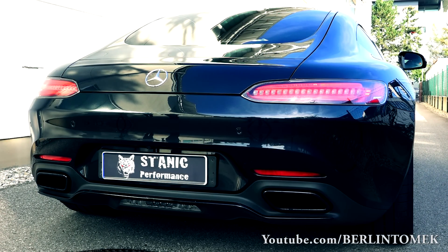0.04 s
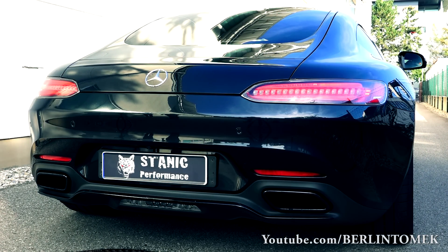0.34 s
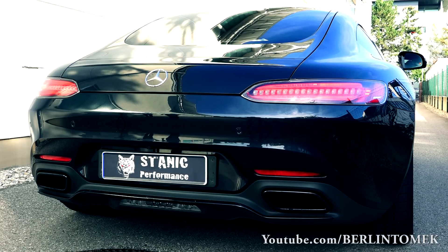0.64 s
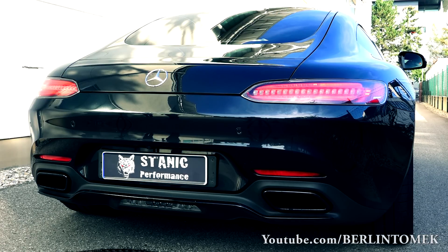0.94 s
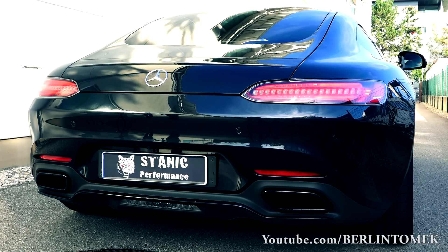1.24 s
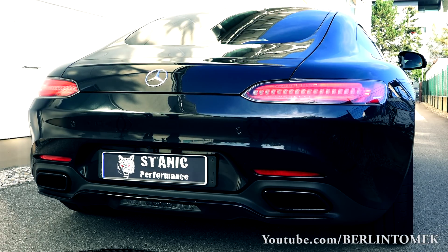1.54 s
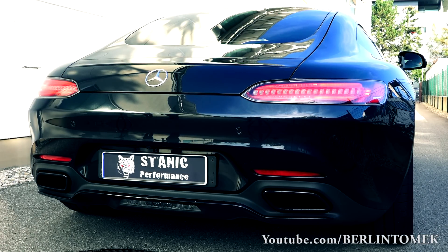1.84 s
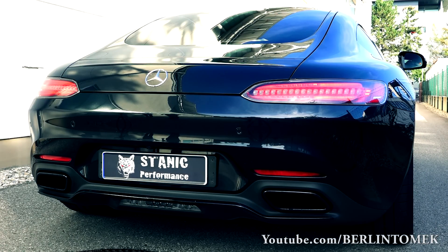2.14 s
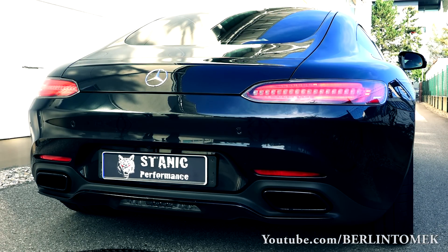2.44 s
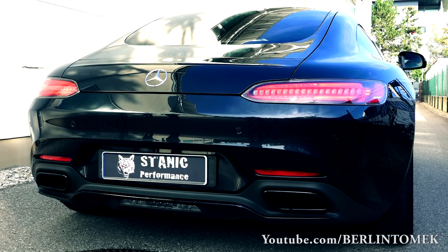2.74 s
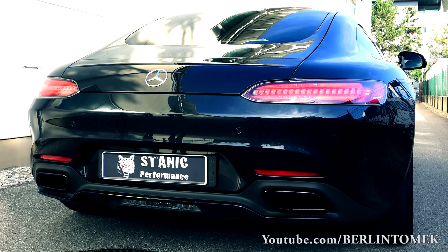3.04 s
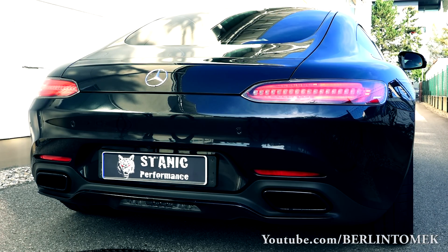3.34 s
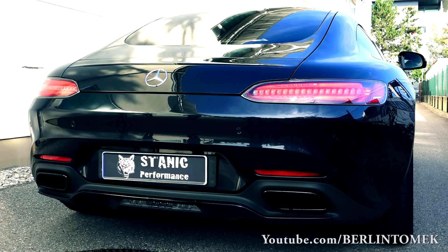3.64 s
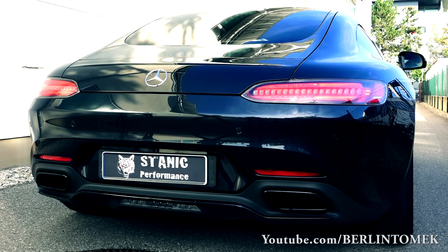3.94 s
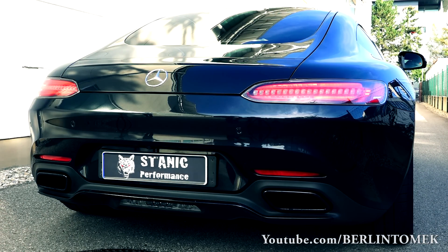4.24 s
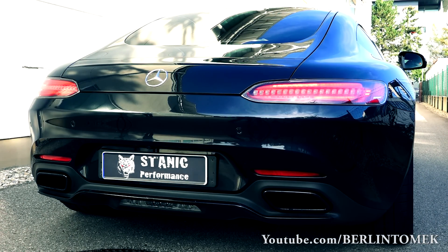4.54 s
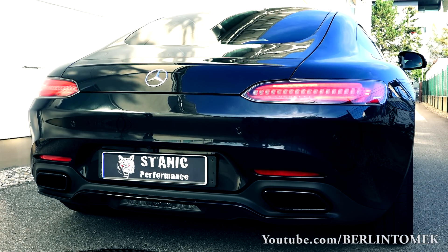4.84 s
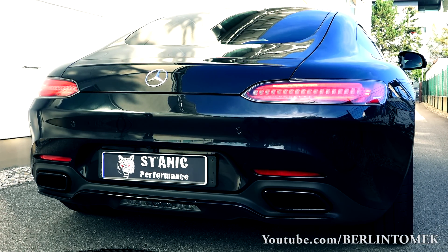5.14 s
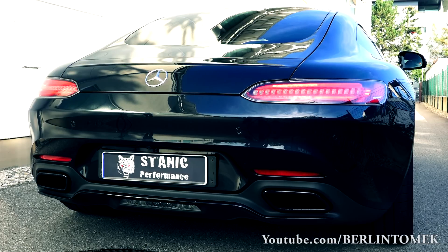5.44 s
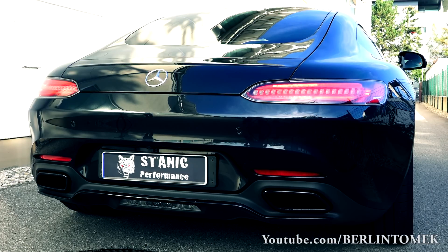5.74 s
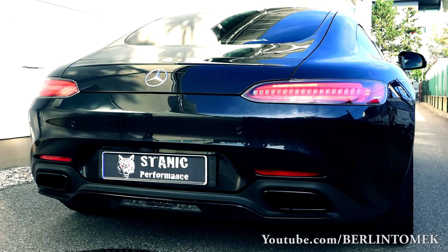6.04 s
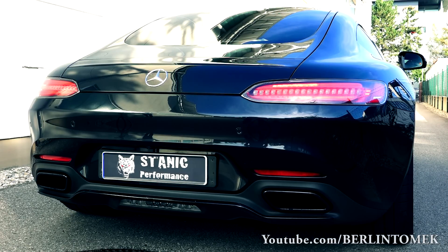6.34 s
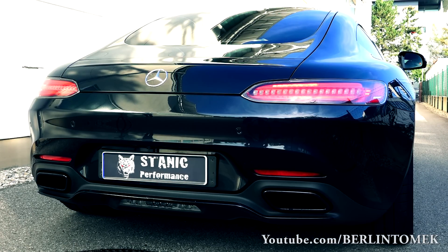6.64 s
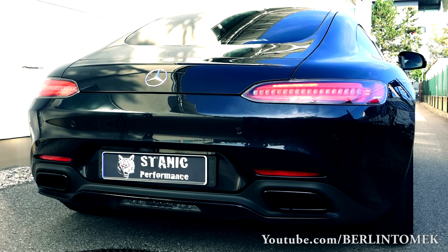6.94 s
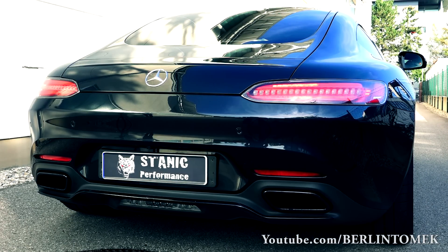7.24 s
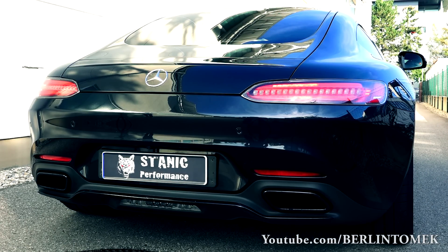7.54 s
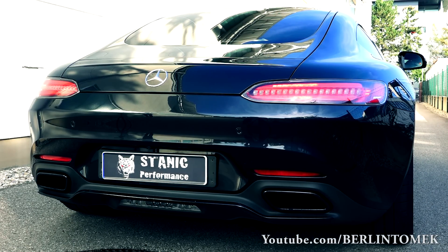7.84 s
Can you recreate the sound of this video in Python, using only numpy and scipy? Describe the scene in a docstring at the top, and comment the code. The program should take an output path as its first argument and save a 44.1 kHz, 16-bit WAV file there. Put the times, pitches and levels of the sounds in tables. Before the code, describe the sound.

A parked sports car's V8 is revved in quick, booming blips that climb higher, with exhaust pops, heard close behind.

```python
"""V8 revving, close behind the tailpipes

One microphone just behind a parked sports car, revved again and again, higher towards the end.
Uneven exhaust pulses boom in the silencer and rasp in the pipes under load; gas hisses between blips.
On the overrun unburnt fuel pops in the pipes. A wall nearby throws the sound back."""
import sys
import numpy as np
from scipy import signal
from scipy.fft import rfft, irfft
from scipy.io import wavfile
from scipy.ndimage import uniform_filter1d

SR = 44100
rng = np.random.default_rng(int(sys.argv[2]) if len(sys.argv) > 2 else 0)


def waveform_to_disk(signal):
    """Save audio, clipped to [-1, 1], as 16-bit WAV at the path in sys.argv[1]."""
    frames = np.transpose(np.atleast_2d(signal))
    scaled = np.clip(frames, -1, 1) * 32767
    samples = np.round(scaled).astype(np.int16)
    wavfile.write(sys.argv[1], SR, samples)


N = 352800
TIME = np.arange(N) / SR
TICKS = np.arange(0, N / SR + .002, .002)   # clock of the controls, t/s

# throttle blips: opens/s, shuts/s, top speed/rpm, climb/s, coasting loss/(1/s), boom/dB, rasp/dB,
# opening spit/dB, coasting boom trim/dB, coasting rasp and hiss trim/dB
THROTTLE_BLIPS = [(.07, 0.351, 2593, .2, 1.21, -11.5, -19, -30.5, 2.5, 2.5),
                  (1.015, 1.255, 2174, .23, 1.55, -10.5, -20.5, -29, 3, 2.5),
                  (1.791, 1.975, 1731, 0.15, 1.44, -12.5, -22, -28.5, 1.5, 2.5),
                  (2.372, 2.616, 1930, .26, 1.4, -13, -22.5, -27.5, 2.5, -0.5),
                  (3.094, 3.318, 1716, 0.32, 1.57, -16, -24, -26.5, -0.5, 1),
                  (4.093, 4.3, 1570, .19, 0.023, -16, -28, -27, 4.5, 0),
                  (4.454, 4.745, 2864, 0.27, 1.07, -10.5, -19.5, -33.5, 0.5, 0.5),
                  (5.232, 5.53, 3284, .26, 1.12, -10.5, -18.5, -43, 2, -0.5),
                  (5.657, 5.916, 3898, .2, .89, -9.5, -18.5, -46, 0.5, -0.5),
                  (6.202, 6.48, 4436, 0.22, 0.89, -11, -16.5, -50, 0.5, -1),
                  (7.11, 7.412, 4313, 0.24, 0.8, -11, -17, -45, -3.5, -5.5),
                  (7.632, 7.893, 5008, 0.22, 0.83, -13, -20, -48, 4, -8)]
# silencer response to the slow part of a pulse: f/Hz, level/dB
SILENCER_RESPONSE = [(20, -21.5), (45, -10), (75, -11), (100, -7.5), (130, -1.5), (165, 3), (210, -0.5),
                     (240, -1), (275, -9.5), (315, -17), (353, -13), (410, -23.5), (480, -14.5), (680, -33),
                     (1100, -63)]
# tailpipe response to a steep pulse front: f/Hz, level/dB
TAILPIPE_RESPONSE = [(200, -11.5), (480, 1.5), (680, -10.5), (830, -1.5), (915, 6), (1000, -2), (1290, 8.5),
                     (1600, 3), (2050, -8), (2600, -14), (3800, -19.5), (5000, -45), (8000, -67.5),
                     (14000, -63)]


def from_db(db):
    return 10 ** (np.asarray(db) / 20)


def rms_one(x):
    return x / np.sqrt(np.mean(x ** 2) + 1e-20)


def drift(per_s):
    """Smooth random wander with an RMS of 1."""
    knots = rng.standard_normal(int(per_s * N / SR) + 2)
    return rms_one(np.interp(TIME * per_s, np.arange(len(knots)), knots))


def butter(x, hz, kind, order=2):
    return signal.sosfilt(signal.butter(order, hz, kind, fs=SR, output="sos"), x + 1e-18)


def resonate(x, response, size=8192):
    """Minimum-phase filter from rows of f/Hz, level/dB."""
    hz, db = np.transpose(response)
    grid = np.maximum(np.arange(size // 2 + 1) * SR / size, 1)
    cepstrum = irfft(np.log(from_db(np.interp(np.log(grid), np.log(hz), db))))
    cepstrum[1:size // 2] *= 2
    cepstrum[size // 2 + 1:] = 0
    return signal.fftconvolve(x, irfft(np.exp(rfft(cepstrum))))[:N]


def ring(clicks, hz, t60):
    """A unit click sets a sine of height 1 ringing."""
    r, w = from_db(-60 / (t60 * SR)), 2 * np.pi * hz / SR
    return signal.lfilter([0, np.sin(w)], [1, -2 * r * np.cos(w), r * r], clicks + 1e-18)


def resonance(x, hz, width_hz):
    """One mode, with gain 1 at its centre."""
    r, w = np.exp(-np.pi * width_hz / SR), 2 * np.pi * hz / SR
    return signal.lfilter(np.array([1, 0, -1]) * (1 - r * r) / 2, [1, -2 * r * np.cos(w), r * r], x)


def evened(x, size=3000):
    """Unit level over about an engine cycle; the throb inside the cycle stays."""
    return x / np.sqrt(uniform_filter1d(uniform_filter1d(x ** 2, size), size) + 1e-14)


def clicks_at(times, heights):
    out = np.zeros(N)
    np.add.at(out, np.clip(np.round(times * SR).astype(int), 0, N - 1), heights)
    return out


def fading(clicks, seconds):
    """Each click starts an exponential decay."""
    return signal.lfilter([1], [1, -np.exp(-1 / (seconds * SR))], clicks + 1e-18)


def envelope(start, end, attack_s, release_s):
    """Straight attack, hold, exponential release."""
    return np.clip((TICKS - start) / attack_s, 0, 1) * np.exp(-np.maximum(TICKS - end, 0) / release_s)


def crank_speed(start_rpm=1297.6, idle_rpm=924.8, flywheel_s=.05):
    """Each blip pulls the speed up, ever more gently; friction drags it back towards idle."""
    rpm = np.full(len(TICKS), start_rpm)
    t = TICKS + .02   # the crank answers before the tailpipes do
    for opens, shuts, top, climb_s, loss_per_s, *_ in THROTTLE_BLIPS:
        to_go = (1 - np.clip((t - opens) / climb_s, 0, 1)) ** 2
        climb = top + (np.interp(opens, t, rpm) - top) * to_go
        coast = np.exp(-loss_per_s * np.maximum(t - shuts, 0))
        rpm = np.where(t < opens, rpm, np.maximum(climb * coast, idle_rpm))
    return uniform_filter1d(rpm, int(flywheel_s / TICKS[1]), mode="nearest")   # inertia rounds corners


def on_throttle(rpm, rasp_db_per_octave=15, arch_db=2):
    """Load, opening and gains of boom, rasp and hiss: a blip spits, builds to a rush, then vents boost."""
    load, opening, boom_gain, rasp_gain, hiss_gain = np.zeros((5, len(TICKS)))
    for opens, shuts, top, _, _, boom_db, rasp_db, spit_db, *_ in THROTTLE_BLIPS:
        lifts = shuts - .044   # the rasp fades as the pedal starts to lift
        held = envelope(opens - .03, shuts, attack_s=.064, release_s=.012)   # the boom swells first
        pedal = envelope(opens, lifts, attack_s=.013, release_s=.046)
        progress = np.clip((TICKS - opens) / (shuts - opens), 0, 1)
        arch = np.sin(np.pi * progress ** 1.2) ** 2 - .5   # fiercest just past mid-blip
        bark = from_db(rasp_db + arch_db * arch + rasp_db_per_octave * np.log2(rpm / top))
        spit = from_db(spit_db) * envelope(opens, opens + .053, attack_s=.053, release_s=.098)
        rush = from_db(-30.5) * envelope(lifts - .12, lifts, attack_s=.12, release_s=.046)
        blow_off = from_db(-32.5) * envelope(shuts, shuts + .053, attack_s=.053, release_s=.076)
        load += pedal
        opening += held
        boom_gain += from_db(boom_db) * held
        rasp_gain += bark * pedal * np.sqrt(held)
        hiss_gain += spit * held + (rush + blow_off) * (top / 4000) ** 2
    boom_gain *= from_db(-5 * np.exp(-((rpm - 4120) / 199) ** 2))   # the boom thins around 4120 rpm
    load *= np.interp(rpm, [1500, 2600], [.75, 1])
    return np.clip(load, 0, 1), np.clip(opening, 0, 1), boom_gain, rasp_gain, hiss_gain


def off_throttle(rpm, opening):
    """Gains of boom, rasp and hiss while coasting: set by the speed, trimmed anew by each blip."""
    # exhaust with the throttle shut: speed/rpm, boom/dB, rasp/dB, hiss/dB
    coasting = [(892, -27, -42, -47), (1020, -35, -41.5, -39), (1470, -27, -40, -39),
                (2200, -20.5, -36.5, -36), (3240, -19.5, -33, -30.5), (3800, -12.5, -30, -27.5)]
    boom_trim, gas_trim, lull_db = 7.5, 0, 0   # the boom starts lively from an earlier blip
    for opens, shuts, *_, boom_trim_db, gas_trim_db in THROTTLE_BLIPS:
        progress = np.clip((TICKS - opens) / (shuts - opens), 0, 1)
        boom_trim += (boom_trim_db - boom_trim) * progress
        gas_trim += (gas_trim_db - gas_trim) * progress
        lull_db += 2 * np.exp(-((TICKS - opens + .031) / .016) ** 2)   # an ebb just before the blip
    speeds, *levels = np.transpose(coasting)
    boom_db, rasp_db, hiss_db = (np.interp(rpm, speeds, db) for db in levels)
    waver_db = np.interp(TICKS, TIME, drift(per_s=14))
    return (from_db(boom_db + boom_trim + waver_db - .91 * lull_db) * (1 - opening),
            from_db(rasp_db + gas_trim - lull_db),
            from_db(hiss_db + gas_trim - lull_db - .98 * opening))


def firings(rpm):
    """Time and strength of every exhaust pulse: eight in two turns of the crank."""
    # cylinders in firing order: pulse strength/dB, lag at the tailpipe/crank degrees
    cylinders = [(6.5, 19.5), (2, 47.5), (3.5, 49.5), (8.5, 18), (-2, 54.5), (3.5, 40), (3.5, 25.5),
                 (1.5, -0.5)]
    degrees = np.cumsum(rpm) * 6 / SR
    k = np.arange(int(degrees[-1] / 90))
    strength_db, lag = np.array(cylinders)[k % len(cylinders)].T
    return np.interp(k * 90 + lag, degrees, TIME), strength_db


def pulses(times, strength_db, scatter_db, jitter_s):
    """No two combustions are quite alike in strength or timing."""
    timing, strength = rng.standard_normal((len(times), 2)).T
    return clicks_at(times + jitter_s * timing, from_db(strength_db + scatter_db * strength))


def drone(rpm, load):
    """The repeating part of the pulse train, voiced by the silencer; it wavers more on the overrun."""
    # engine orders: multiple of the cycle rate, level under load/dB, level on the overrun/dB
    orders = [(1, -10, -10), (2, -9, -7), (3, -3.5, -2), (4, -11, -10), (5, -12, 1.5), (6, 0, -5),
              (7, -4.5, -5.5), (8, -1.5, 0), (9, -8.5, -8.5), (10, -1.2, -4), (11, 0.5, -2.5),
              (12, -13.5, -20.5), (13, 0, -7.5), (14, -4, -16), (15, -10, -6), (16, -7.5, -16)]
    cycles = np.cumsum(rpm) / 120 / SR
    waver_db = 2.6 - 1.4 * load
    out = np.zeros(N)
    for order, loaded_db, overrun_db in orders:
        level_db = overrun_db + load * (loaded_db - overrun_db) + waver_db * drift(per_s=22)
        out += from_db(level_db) * np.sin(2 * np.pi * (order * cycles + rng.random()))
    return evened(resonate(out, SILENCER_RESPONSE))


def burble(times, strength_db, rpm):
    """Uneven firings thud in the silencer, deeper at low speed."""
    thuds = resonate(pulses(times, strength_db, scatter_db=2, jitter_s=.00041), SILENCER_RESPONSE)
    depth = np.interp(rpm, [900, 2800], [1.6, .3])
    return evened(butter(thuds + depth * butter(thuds, 110, "low", order=1), 31, "high"))


def boom(times, strength_db, rpm, load):
    """Near idle the engine burbles; speed and throttle make it run clean."""
    rough_db = np.interp(rpm, [950, 1530, 2700, 4340], [-4, -7, -7, -11.5]) + 4.25 * (1 - load)
    return evened(drone(rpm, load) + from_db(rough_db) * burble(times, strength_db, rpm), size=4000)


def rasp(times, strength_db, rpm, load, round_trip_s=.0093):
    """Steep fronts bark in the pipes, each trailed by a turbulent puff and a silencer reflection."""
    fronts = pulses(times, .8 * strength_db, scatter_db=1.6, jitter_s=.00003)
    puffs = fading(fronts, .0045) * rng.standard_normal(N)
    front_share = .15 + .65 * load * np.clip(rpm / 3000, 0, 1)
    flow = np.sqrt(front_share) * evened(fronts) + np.sqrt(1 - front_share) * evened(puffs)
    reflection = .2 * np.interp(TIME - round_trip_s, TIME, flow)
    bark = evened(resonate(flow + reflection, TAILPIPE_RESPONSE))
    sharpness = .38 * (rpm / 4500) ** 2   # fast flow sharpens the fronts
    return bark + sharpness * butter(bark, 3000, "high", order=1)


def gas_hiss(times, strength_db, rpm):
    """Soft chuffs ring the metal tips unevenly; at speed they merge into a smooth, brighter rush."""
    # sheet-metal modes of the tips: f/Hz, width/Hz, level/dB
    tip_modes = [(1114, 50, 20.5), (1242, 150, 14), (1566, 92, 15.5), (1957, 75, 5), (2224, 120, 6),
                 (2483, 180, 9.5), (2687, 43, -39.5), (3470, 380, 3.5), (3573, 86, -1.5), (4640, 83, -34),
                 (5600, 350, -25), (7670, 1870, -3.5)]
    # spectrum of gas rushing through the tips: f/Hz, level/dB
    rush_spectrum = [(250, 0.5), (700, 6.5), (1100, 3), (1600, -10), (1900, 2), (2700, 0), (3150, -8.5),
                     (3800, -2), (4400, -17), (5000, -16.5), (6700, -23.5), (7800, -29.5), (10000, -28),
                     (14000, -35)]
    train = pulses(times, .6 * strength_db, scatter_db=3.5, jitter_s=.001)
    chuffs = evened(fading(fading(train, .003), .002))
    puffs = (.3 + chuffs) * rng.standard_normal(N)
    modes = sum(resonance(puffs * from_db(db + 3.76 * drift(per_s=60)), hz, width_hz)
                for hz, width_hz, db in tip_modes)
    ringing = rms_one(butter(butter(modes, 900, "high"), 4700, "low", order=3))
    rush = resonate((2 + chuffs) * rng.standard_normal(N), rush_spectrum)
    rush = rms_one(rush + .5 * (rpm / 4500) ** 2 * butter(rush, [4200, 8000], "band", order=1))
    smooth = np.interp(rpm, [1000, 2500, 4200], [.27, .4, .85])
    return np.sqrt(smooth) * rush + from_db(2.5) * np.sqrt(1 - smooth) * ringing


def crackle(count=9, spread_db=2.5):
    """Afterfire on the way down from high revs: rows of small pops at random moments."""
    # spells of crackle: starts/s, ends/s, blow/dB, crack/dB, thump/dB
    spells = [(6.569, 6.72, -19.5, -39, -21), (6.72, 6.86, -20, -50, -23.5)]
    rows = []
    for starts, ends, *levels_db in spells:
        for k, (when, size) in enumerate(rng.random((count, 2))):
            t = starts + (ends - starts) * (k + when) / count
            rows.append((t, *(np.array(levels_db) + spread_db * (2 * size - 1))))
    return rows


def pops():
    """Fuel ignites in the pipe: a blow on its modes, a silencer thump, a spit of gas, a sharp crack."""
    # overrun pops, levels relative within each column: t/s, blow/dB, crack/dB, thump/dB
    ignitions = [(0.489, -14.5, -38, -11.5), (0.617, -19, -61, -17.5), (0.675, -25, -60, -19),
                 (4.89, -11.5, -43, -22), (4.977, -22, -38, -35), (5.054, -21.5, -50, -11.5),
                 (6.574, -7.5, -46, -8.5), (6.588, -9.5, -37, -17), (6.629, -12, -33, -15.5),
                 (6.664, -13, -33, -8.5), (6.673, -5.5, -21.5, -28), (6.765, -15, -48, -13),
                 (6.79, -11.5, -53, -14.5), (6.825, -12, -52.5, -16), (6.834, -20, -51, -9),
                 (6.909, -6, -30, -17), (7.916, -13.5, -38, -27), (7.941, -10, -34, -9),
                 (7.958, -5.5, -13.5, -8), (7.991, -11.5, -27, -8)]
    # pipe modes rung by a pop: f/Hz, level/dB, t60/s
    pipe_modes = [(482, -19, 0.029), (982, -7, 0.011), (1240, -1.5, 0.011), (1660, -3.5, 0.0067),
                  (2570, -12, 0.0052), (3690, -14.5, 0.0084)]
    times, blow_db, crack_db, thump_db = np.vstack([ignitions, crackle()]).T
    scatter_db = rng.standard_normal((len(times), len(pipe_modes)))
    body = sum(ring(clicks_at(times, from_db(blow_db + db + scatter_db[:, k])), hz, t60) * (-1) ** k
               for k, (hz, db, t60) in enumerate(pipe_modes))
    thump = ring(clicks_at(times, from_db(thump_db)), hz=183, t60=.076)
    spit = fading(clicks_at(times, from_db(blow_db)), .0056) * rng.standard_normal(N)
    crack = fading(clicks_at(times, from_db(crack_db)), .0022) * rng.standard_normal(N)
    return (from_db(9) * body + from_db(7) * thump + from_db(5) * resonate(spit, TAILPIPE_RESPONSE)
            + from_db(5.5) * butter(crack, [1500, 7000], "band", order=1))


def yard(x, tail_db=-17, t60=.3):
    """Close up the direct sound leads; a few dull echoes and a short diffuse tail follow."""
    # echoes from ground, bumper and wall: delay/s, level/dB
    echoes = [(.0031, -23.5), (.0097, -17.5), (.021, -17.5)]
    delays, levels_db = np.transpose(echoes)
    t = TIME[:SR // 2]
    early = clicks_at(delays, from_db(levels_db))[:len(t)]
    tail = rng.standard_normal(len(t)) * from_db(-60 * t / t60) * (t > .012)
    response = early + from_db(tail_db) * tail / np.sqrt(np.sum(tail ** 2))
    return x + butter(signal.fftconvolve(x, response)[:N], [400, 6000], "band", order=1)


def scene():
    """The throttle sets speed and strength; boom, rasp and hiss all follow the same firings."""
    rpm = crank_speed()
    load, opening, *driven = on_throttle(rpm)
    gains = np.hypot(driven, off_throttle(rpm, opening))
    rpm, load, boom_gain, rasp_gain, hiss_gain = (np.interp(TIME, TICKS, c) for c in (rpm, load, *gains))
    rpm *= 1 + .004 * drift(per_s=30)   # the crank speed flutters
    times, strength_db = firings(rpm)
    low = boom_gain * boom(times, strength_db, rpm, load)
    bark = rasp_gain * rasp(times, strength_db, rpm, load)
    hiss = hiss_gain * gas_hiss(times, strength_db, rpm)
    return yard(low + bark + hiss + pops())[None]


def record(dry):
    """The loudest peaks are rounded off and the treble is gone above 15.3 kHz."""
    rounded = dry / (1 + dry ** 6) ** (1 / 6)
    return signal.sosfilt(signal.cheby2(14, 60, 15300, fs=SR, output="sos"), rounded)


dry = scene()
out = record(dry)
waveform_to_disk(out)
```